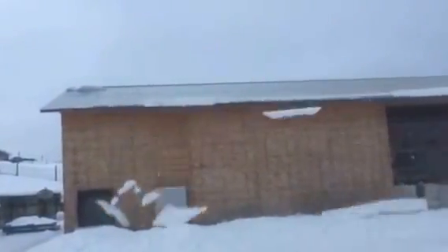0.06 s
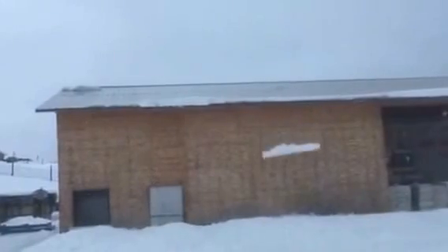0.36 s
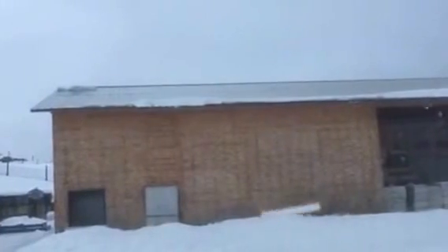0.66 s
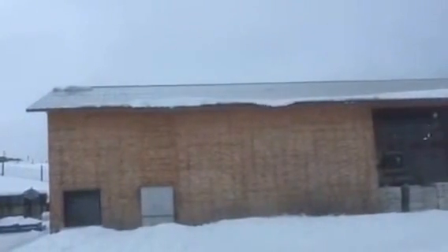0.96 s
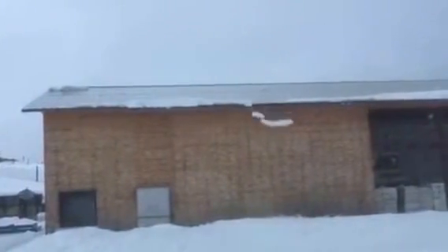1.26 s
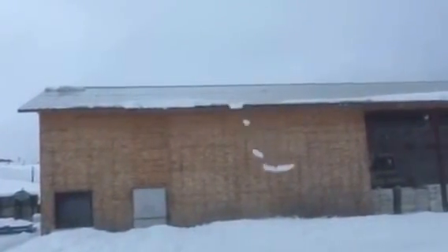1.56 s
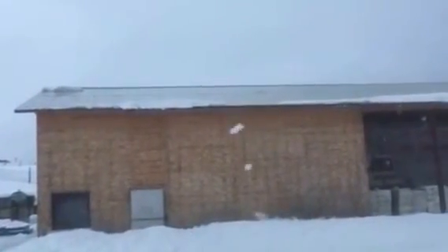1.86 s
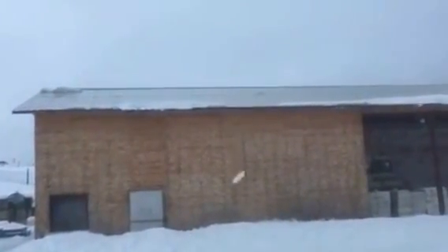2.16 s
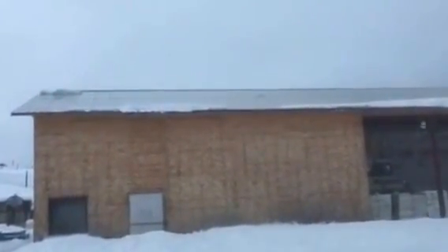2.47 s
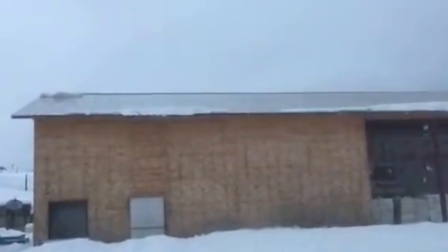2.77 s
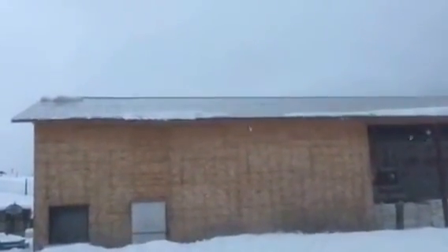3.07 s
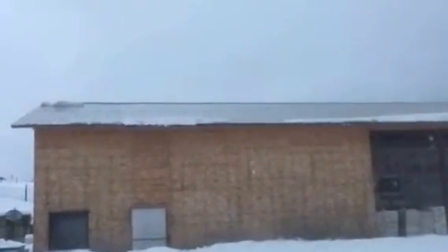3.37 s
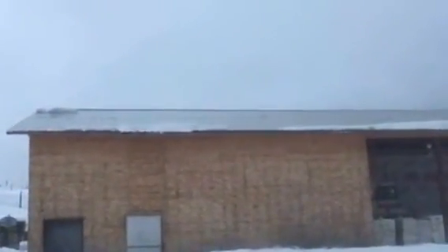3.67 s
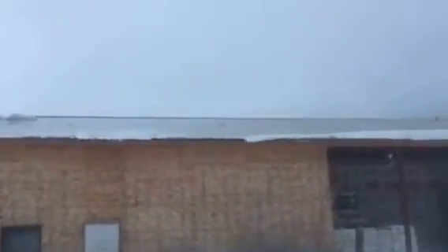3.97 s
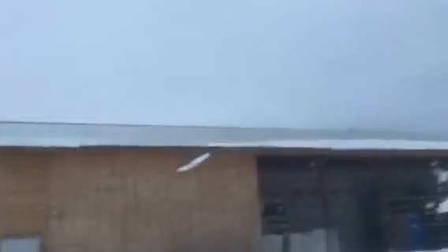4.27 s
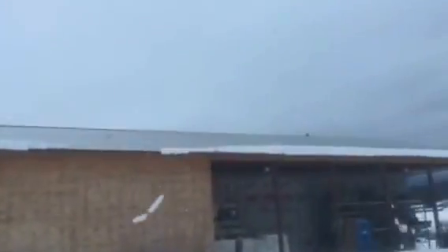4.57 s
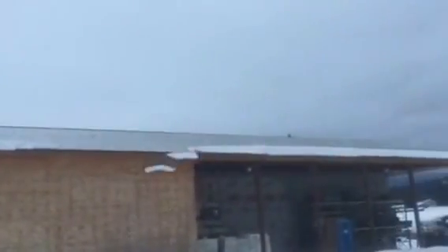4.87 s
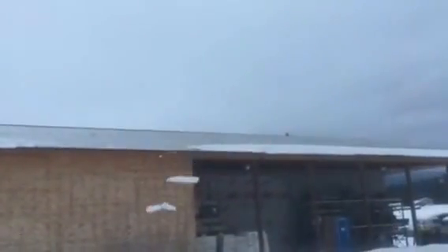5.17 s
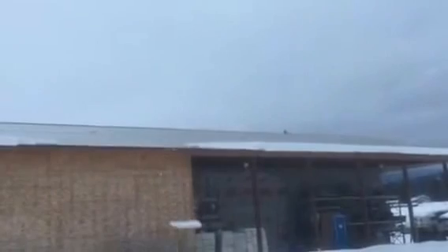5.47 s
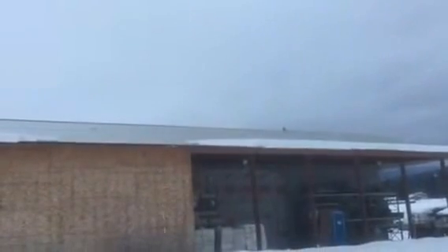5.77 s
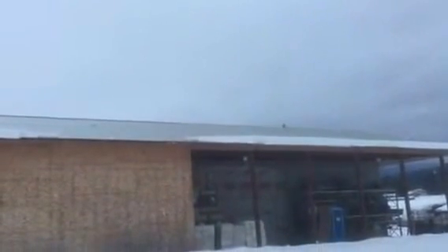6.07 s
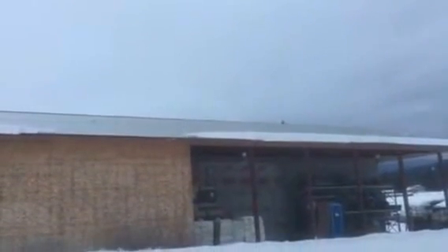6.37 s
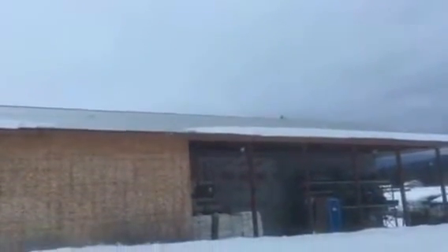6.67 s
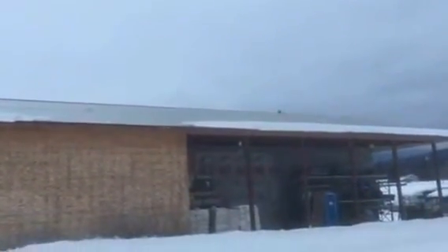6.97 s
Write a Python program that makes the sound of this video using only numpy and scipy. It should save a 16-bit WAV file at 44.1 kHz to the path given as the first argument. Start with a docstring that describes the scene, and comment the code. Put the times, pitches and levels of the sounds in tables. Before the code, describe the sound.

Slabs of snow slide off a roof and thud softly into snow, over light wind and close camera handling noise.

```python
"""A barn yard in winter. Slabs of snow slip off the metal roof and thud into the snow below, each with
a puff of powder; crumbs patter down after some falls. A light wind murmurs over the yard and rumbles on
the microphone. Close by, jacket cloth swishes as its threads catch, there are icy ticks and a few taps
and creaks, and a hand rubs and jolts the camera's case, which rasps, squeaks and hums."""
import sys
import numpy as np
from scipy import signal
from scipy.fft import rfft, irfft
from scipy.io import wavfile

SR = 44100
rng = np.random.default_rng(int(sys.argv[2]) if len(sys.argv) > 2 else 0)


def wrap_up_sound(samples):
    """Save the sound to the file named by the first command line argument, as 16-bit audio."""
    columns = np.atleast_2d(samples).T
    # keep every value between -1 and 1, then stretch to whole-number steps
    tamed = np.clip(columns, -1, 1)
    steps = np.round(tamed * 32767).astype(np.int16)
    wavfile.write(sys.argv[1], SR, steps)


N = 313992
TIME = np.arange(N) / SR
FREQS = np.fft.rfftfreq(N, 1 / SR)

# tone colour of spraying snow powder: f/Hz, level/dB
POWDER_COLOUR = [(200, -6), (350, -5), (600, -2.5), (1000, -6), (1600, -9.5), (2300, -17), (3500, -13),
                 (4900, -20.5), (5800, -13), (7700, -15), (12500, -9), (15500, -11)]


def undb(db):
    """Turn decibels into a factor to multiply a sound by."""
    return 10 ** (np.asarray(db) / 20)


def unit(x):
    """Scale a sound to an average strength (rms) of 1."""
    return x / np.sqrt(np.mean(x ** 2))


def noise():
    """An even hiss: white noise."""
    return rng.standard_normal(N)


def grains(per_s, spread_db):
    """Tiny clicks at random moments; more spread makes their sizes more uneven."""
    sizes = undb(spread_db * np.minimum(rng.exponential(size=N), 4))
    return noise() * sizes * (rng.random(N) < per_s / SR)


def colour(x, spectrum):
    """Shape a sound by (f/Hz, level/dB) points, falling steeply beyond both ends; strength 1."""
    hz, db = np.transpose(spectrum)
    gain = undb(np.interp(np.log(FREQS + 1), np.log(hz), db))
    ends = np.minimum(FREQS / hz[0], 1) ** 3 * np.minimum(hz[-1] / (FREQS + 1), 1) ** 3
    return unit(irfft(rfft(x) * gain * ends, N))


def ring(x, modes):
    """Let a sound ring at an object's own tones (f/Hz, width/Hz, level/dB); strength 1."""
    response = sum(undb(db) * 1j * FREQS * width / (hz ** 2 - FREQS ** 2 + 1j * FREQS * width)
                   for hz, width, db in modes)
    return unit(irfft(rfft(x) * response, N))


def waver(per_s, depth_db):
    """A factor that wanders at random around 1."""
    points = rng.standard_normal(4096)
    return undb(depth_db * np.interp(TIME * per_s, np.arange(len(points)), points))


def add(track, s, sound):
    """Mix a sound into a track at s seconds."""
    start = max(int(s * SR), 0)
    track[start:start + len(sound)] += sound[:N - start]


def swell(s, attack_s, hold_s, release_s):
    """A loudness curve from s seconds: rises, holds until hold_s has passed, dies away."""
    t = TIME - s
    return np.clip(t / attack_s, 0, 1) * np.exp(-np.maximum(t - hold_s, 0) / release_s)


def burst(swell_s, linger=0., order=2):
    """A half-second loudness curve: peaks near swell_s and dies away; a slower share may linger."""
    u = TIME[:SR // 2] / swell_s
    shape = (u * np.exp(1 - u)) ** order + linger * (u / 4) * np.exp(1 - u / 4)
    return shape * np.sqrt(1 - u / u[-1])


def thud(hz, swell_s, drop, drop_s):
    """A few swings of air pressure that slow down to hz as a soft blow spreads."""
    t = TIME[:SR // 2]
    cycles = hz * (t + drop * drop_s * (1 - np.exp(-t / drop_s)))
    return burst(swell_s, order=1) * np.sin(2 * np.pi * cycles)


def click(db, hz, width_hz, decay_s):
    """A short burst of noise in one broad band of pitches."""
    t = TIME[:SR // 4]
    b, a = signal.iirpeak(hz, hz / width_hz, SR)
    band = signal.lfilter(b, a, signal.lfilter(b, a, rng.standard_normal(len(t))))
    return undb(db) * unit(band) * np.exp(-t / decay_s) * np.minimum(t / 0.0011, 1)


def wind():
    """Far wind murmurs and sighs; a fading gust rustles, hisses and buffets the microphone."""
    # strength of the far wind: t/s, low murmur/dB, higher sigh/dB
    far_wind = [(0, -66, -66), (.7, -67.5, -80), (1.8, -59.5, -69.5), (3.1, -62, -72), (3.6, -58, -65.5),
                (4.4, -60, -64.5), (5.4, -61.5, -66), (6.3, -60, -62), (7.12, -63.5, -65.5)]
    # tone colours of the wind's five parts: f/Hz, level/dB
    murmur_colour = [(170, -6), (380, -5), (500, -6), (620, 1.5), (850, 3), (1150, -2), (1600, -17),
                     (2500, -12)]
    sigh_colour = [(800, -13), (1100, -2), (1470, 2), (1700, -0.5), (2000, -8.5), (3000, -49)]
    rustle_colour = [(1500, 0.5), (2100, -1), (2800, -1.5), (3800, -7), (4900, -10.5), (7000, -13.5)]
    hiss_colour = [(3500, -3), (4900, -12.5), (5700, -5), (7600, -9), (9500, -3), (10400, -7.5),
                   (12600, -2), (15500, -4.5)]
    rumble_colour = [(28, 3.5), (45, 6.5), (90, 1.5), (150, -3.5), (240, -14), (330, -25)]
    times, *levels = np.transpose(far_wind)
    murmur, sigh = (undb(np.interp(TIME, times, db)) for db in levels)
    gust = np.exp(-TIME / 3.06)  # fades to about a third in 3 s
    faint_ticks = undb(-10) * colour(grains(80, 2), hiss_colour)
    hiss = colour(noise(), hiss_colour) + faint_ticks
    return (murmur * colour(noise(), murmur_colour) * waver(4.0, 0.15)
            + sigh * colour(noise(), sigh_colour) * waver(3.8, 1.0)
            + undb(-75 + 6 * gust) * colour(noise(), rustle_colour) * waver(18, 0.33)
            + undb(-78.5 + 8.5 * gust) * hiss * waver(11, 0.98)
            + undb(-67.5 + 11 * gust) * colour(noise(), rumble_colour) * waver(6.5, 0.68))


def settling_crumbs():
    """Loose lumps patter down and powder trickles over them a little longer."""
    # spills of crumbs: t/s, patter/dB, trickle/dB (both turned down in the last line)
    spills = [(-.25, -38.5, -63.5), (.26, -35.5, -54.5), (.52, -48, -58.5), (4.98, -53.5, -60)]
    # tone colour of the lumps: f/Hz, level/dB
    lump_colour = [(35, -2), (70, 4.5), (120, -3), (180, -6.5), (240, -21), (310, -35)]
    attack_s = 0.027
    patter = sum(undb(db) * swell(s, attack_s, hold_s=attack_s, release_s=0.19) for s, db, _ in spills)
    trickle = sum(undb(db) * swell(s, attack_s, hold_s=0.21, release_s=0.26) for s, _, db in spills)
    lumps = colour(grains(450, 0.41), lump_colour)
    powder = colour(grains(9000, 0.75), POWDER_COLOUR) * waver(45, 0.74)
    return undb(-2.5) * patter * lumps + undb(-5.5) * trickle * powder


def landing_slabs():
    """Each slab pushes out air with a thud while its crystals crunch into powder."""
    # slabs hitting the snow: t/s, thud/dB, final pitch/Hz, powder/dB, crumbling time/s
    slabs = [(0.201, -27.5, 72, -49.5, 0.019), (0.227, -18, 67.7, -53, 0.013),
             (0.243, -21.5, 77.8, -48.5, 0.01), (0.268, -28.5, 84, -45.5, 0.012),
             (0.385, -31, 90.4, -58.5, 0.0073), (0.818, -25.5, 59.3, -51.5, 0.024),
             (0.858, -33, 76, -63, .012), (1.738, -50.5, 66.4, -75, 0.017), (1.956, -22, 67, -45.5, 0.01),
             (2.035, -36.5, 116, -54.5, 0.012), (2.263, -34.5, 55.5, -53.5, 0.0091),
             (2.51, -35.5, 60, -47.5, 0.015), (4.961, -33.5, 56, -56.5, 0.01),
             (5.011, -44, 88.6, -55, 0.028), (5.584, -30.5, 91.5, -50, 0.0091),
             (5.607, -38, 87, -50.5, .009), (5.788, -26, 62.6, -48, 0.01)]
    shudder_db, crunch_db = -10, -24.5  # compared with the thud
    thuds, puffs, shudder, crunch = np.zeros((4, N))
    for s, db, hz, powder_db, crumble_s in slabs:
        swell_s = 0.0061 + 0.28 * crumble_s  # a slab that crumbles slowly lands more softly
        add(thuds, s, undb(db) * thud(hz, swell_s, drop=2.78, drop_s=0.0052))
        add(shudder, s, undb(db + shudder_db) * burst(swell_s, linger=0.19))
        # loose flakes arrive just ahead of the slab
        add(puffs, s - crumble_s, undb(powder_db) * burst(2 * crumble_s, linger=0.076, order=5))
        add(crunch, s, undb(db + crunch_db) * burst(swell_s=0.0038, order=1))
    # the slab breaks up, so the blow is uneven; soft snow muffles its upper tones
    breakup = colour(noise(), [(42, 5.5), (70, 5), (160, 0), (240, -7), (300, -18)])
    muffled = signal.sosfilt(signal.butter(8, 255, fs=SR, output="sos"), thuds)
    # the crust gives way first, then the powder sprays
    crust = colour(noise(), [(450, 2.5), (620, 4), (1100, 2), (2000, -15), (4000, -18)])
    powder = colour(grains(16000, 0.2), POWDER_COLOUR)
    return muffled + shudder * breakup + crunch * crust + puffs * powder


def jacket():
    """Threads catch on each other in a swish; cloth touching the camera sounds sharper and flaps."""
    # strokes of cloth: middle t/s, half length/s, swish/dB, touch on the camera/dB
    strokes = [(1.102, 0.12, -57.5, -84), (2.406, 0.085, -57.5, -63), (2.546, 0.07, -52.5, -58.5),
               (2.658, 0.03, -49, -54.5), (2.754, .043, -50, -61.5), (2.863, .11, -55.5, -64.5)]
    # tone colours of the swish and of the sharper touch: f/Hz, level/dB
    swish_colour = [(300, -5), (600, 8.5), (1000, 4.5), (1500, 2.5), (2300, 2.5), (4200, -5), (5200, -15),
                    (7000, -14.5)]
    touch_colour = [(3500, -4.5), (5000, -4), (6300, -5.5), (7600, -14), (9500, -6.5), (10500, -14),
                    (12000, -10), (15500, -21)]
    # low tones of the flapping: f/Hz, width/Hz, level/dB
    flap_tones = [(123, 16, 13), (181, 34, 3), (237, 19, 5), (270, 8.7, -28)]
    swish, touch = sum(np.outer(undb(levels), np.exp(-((TIME - s) / half_s) ** 2))
                       for s, half_s, *levels in strokes)
    threads = grains(9000, 0.84) * waver(70, 1.0)
    flap = undb(11.5) * ring(grains(900, 1.2), flap_tones)
    return swish * colour(threads, swish_colour) + touch * (colour(threads, touch_colour) + flap)


def icy_ticks():
    """Faint, bright ticks that all sound alike."""
    # icy ticks: t/s, level/dB
    ticks = [(1.015, -59.5), (1.467, -67), (1.62, -67), (2.115, -63), (3.312, -66), (3.654, -60),
             (3.853, -63.5), (4.317, -62.5), (5.531, -61), (6.334, -65)]
    track = np.zeros(N)
    for s, db in ticks:
        add(track, s, click(db, hz=10100, width_hz=13230, decay_s=0.007))
    return track


def taps_and_creaks():
    """Small knocks and creaks close by, each with its own tone colour."""
    # taps and creaks: t/s, level/dB, f/Hz, width/Hz, fading time/s
    taps = [(1.696, -53, 2840, 2980, .0032), (2.62, -45, 2200, 3560, .008), (3.815, -54, 2740, 900, 0.059),
            (4.49, -39, 530, 650, 0.0044), (7.052, -47.5, 448, 453, 0.0084)]
    track = np.zeros(N)
    for s, *voice in taps:
        add(track, s, click(*voice))
    return track


def hand_on_case():
    """The hand sticks and slips on the case: its body rumbles and hums, its shell rasps and squeaks."""
    # rubs: t/s, hold/s, rasp/dB, rumble/dB, squeak/dB (turned down in whistle below), hum/dB
    rubs = [(3.551, 0.05, -52, -49, -62, -66), (3.641, 0.092, -57, -46, -66, -51),
            (3.762, 0.14, -63.5, -55.5, -58.5, -55), (4.478, 0.39, -72, -71, -65.5, -75),
            (4.651, .018, -41.5, -35, -50, -35.5), (4.68, 0.021, -44, -38.5, -49.5, -32),
            (4.766, 0.05, -51.5, -44.5, -71, -49), (5.896, 0.082, -55.5, -46, -52.5, -37.5),
            (6.09, 0.042, -59, -82, -57, -63)]
    # jolts of the grip: t/s, level/dB, final pitch/Hz
    grip_jolts = [(3.667, -41, 129), (3.767, -37, 95), (4.655, -17, 49.3), (4.662, -17, 77),
                  (4.690, -26.5, 115), (4.737, -27.5, 85)]
    # the case's own low, middle and high tones: f/Hz, width/Hz, level/dB
    body_tones = [(69.4, 11, 5.5), (131.6, 12, 4), (160, 24, -31), (193, 5.6, -24), (265, 7.8, -37)]
    shell_tones = [(399, 17, -0.5), (614, 13, 8.5), (880, 11, 3.5), (1344, 41, -11), (2900, 110, -16)]
    squeak_tones = [(5190, 47, 8), (8800, 160, -2), (10800, 67, -2), (13800, 60, 2), (14050, 99, -1)]
    # tone colours of the rubbing: f/Hz, level/dB
    rasp_colour = [(250, -14), (480, 7), (650, 10.5), (1050, 4.5), (1700, -1.5), (2800, -8.5), (4300, -45),
                   (6000, -29)]
    squeak_colour = [(3500, -0.5), (4600, -6), (6200, -6), (7600, -13.5), (9000, -8), (10500, -11.5),
                     (13000, -9), (15500, -18.5)]
    attack_s, hum_hz, hum_lag_s = 0.0071, 127.4, 0.0176  # the hum starts once the drag is steady
    rumble, rasp, squeak, hum, jolts = np.zeros((5, N))
    judder = waver(per_s=48, depth_db=1.1)  # the hand presses unevenly
    for s, hold_s, rasp_db, rumble_db, squeak_db, hum_db in rubs:
        release_s = 0.03 + 0.67 * hold_s  # a long rub also dies away slowly
        push = swell(s, attack_s, hold_s, release_s) * judder
        rasp += undb(rasp_db) * push
        squeak += undb(squeak_db) * push
        rumble += undb(rumble_db) * push
        hum += undb(hum_db) * swell(s + hum_lag_s, attack_s, hold_s, release_s)
    for s, db, hz in grip_jolts:
        add(jolts, s, -undb(db) * thud(hz, swell_s=0.0041, drop=1.95, drop_s=0.0057))
    phase = 2 * np.pi * np.cumsum(hum_hz * waver(42.7, 0.3)) / SR
    tone = np.sin(phase) + undb(-16) * np.sin(2 * phase)  # with a quiet octave above
    slips = grains(9000, 0.73) * waver(90, 0.13)
    shell = colour(slips, rasp_colour) + undb(-6.5) * ring(slips, shell_tones)
    whistle = undb(-7.5) * colour(slips, squeak_colour)
    whistle += undb(-14) * ring(noise(), squeak_tones) * waver(35, 2.4)
    body = ring(grains(500, 1.3), body_tones)
    return jolts + hum * tone + rumble * body + rasp * shell + squeak * whistle


def scene():
    """All the sounds meet at one microphone."""
    snow = landing_slabs() + settling_crumbs()
    close_by = jacket() + hand_on_case() + taps_and_creaks() + icy_ticks()
    return (snow + close_by + wind())[None]


def record(dry):
    """The camera thins the deepest bass and cuts the highest treble."""
    bass_hz, top_hz = 36, 15850
    thinned = signal.sosfilt(signal.butter(3, bass_hz, "high", fs=SR, output="sos"), dry)
    return signal.sosfilt(signal.ellip(10, .2, 70, top_hz, fs=SR, output="sos"), thinned)


dry = scene()
out = record(dry)
wrap_up_sound(out)
```